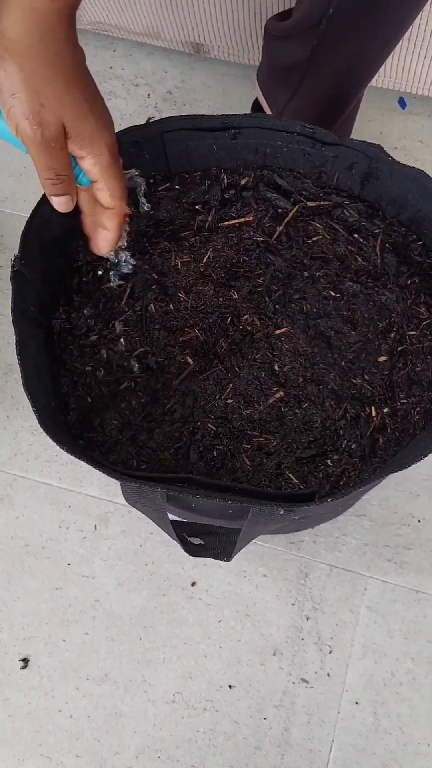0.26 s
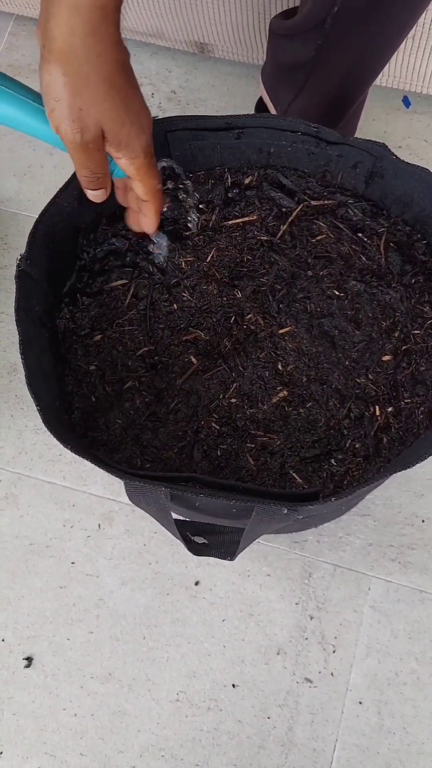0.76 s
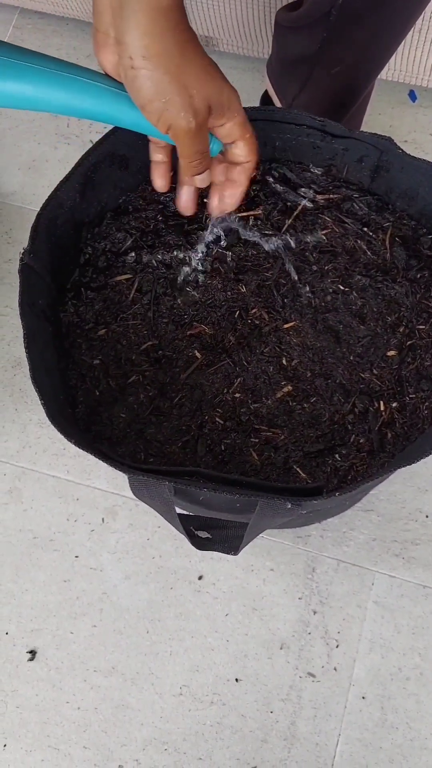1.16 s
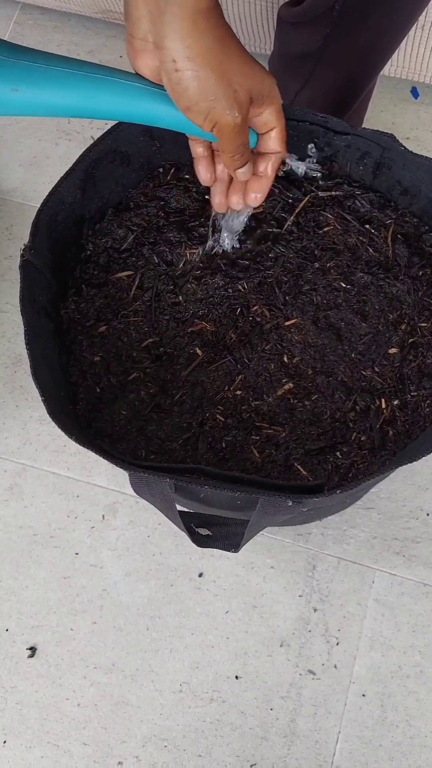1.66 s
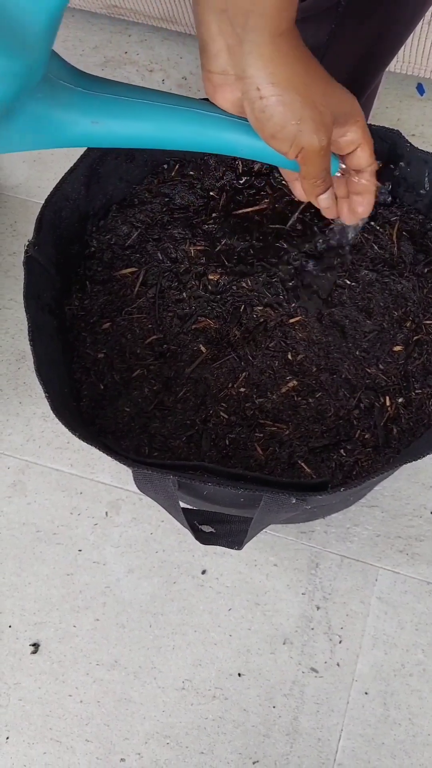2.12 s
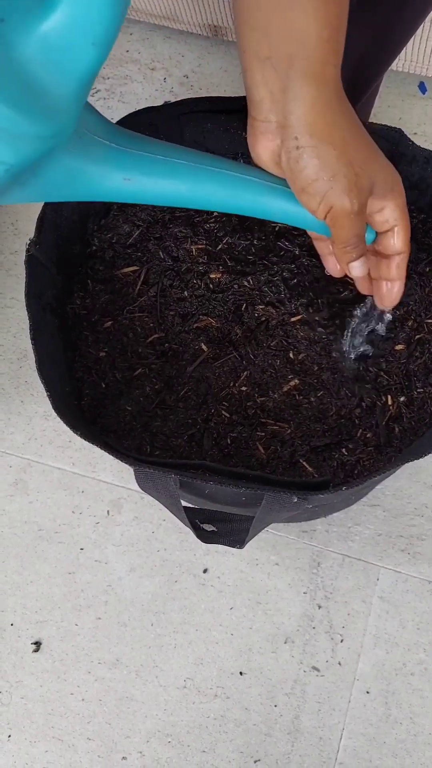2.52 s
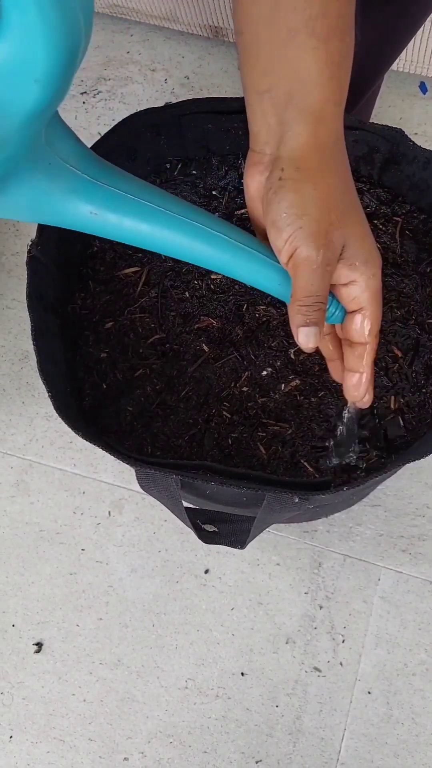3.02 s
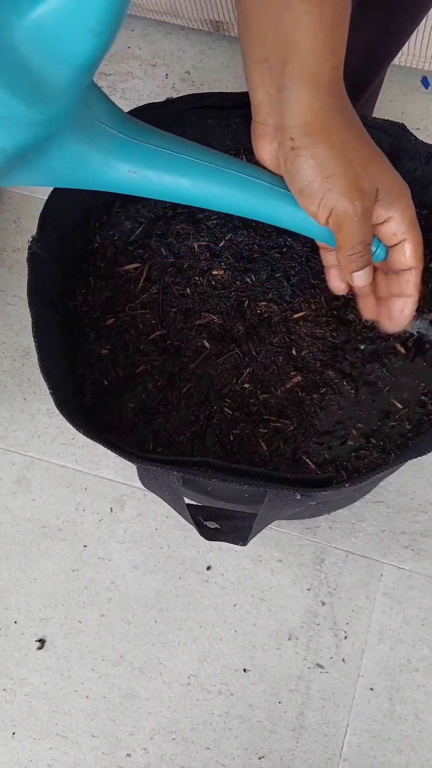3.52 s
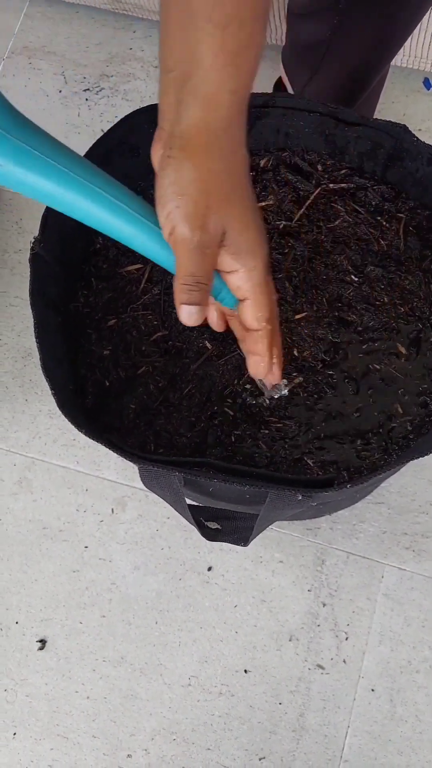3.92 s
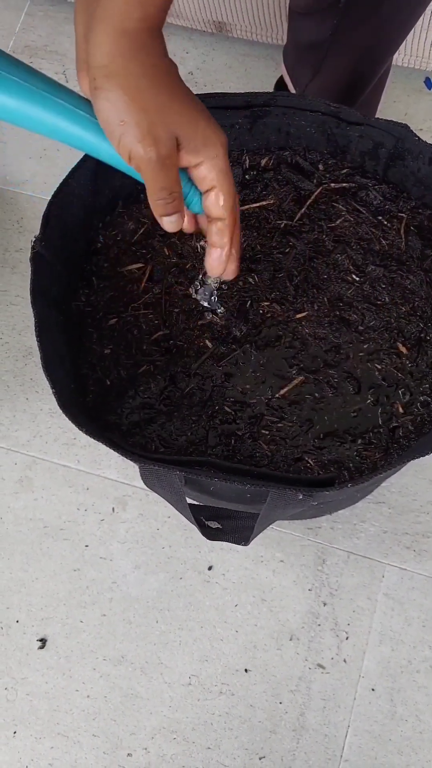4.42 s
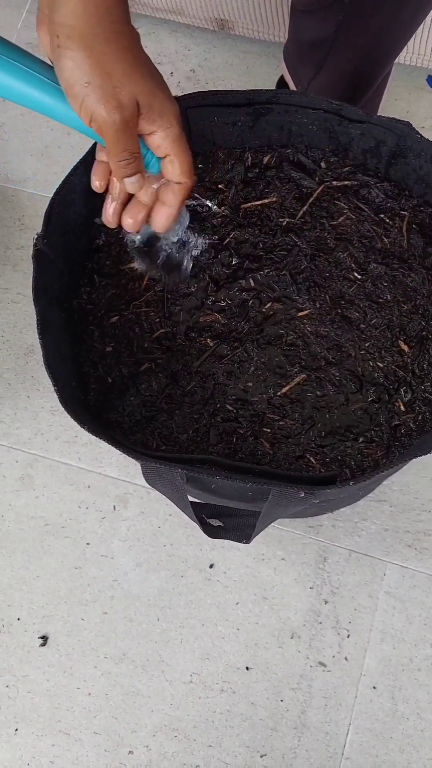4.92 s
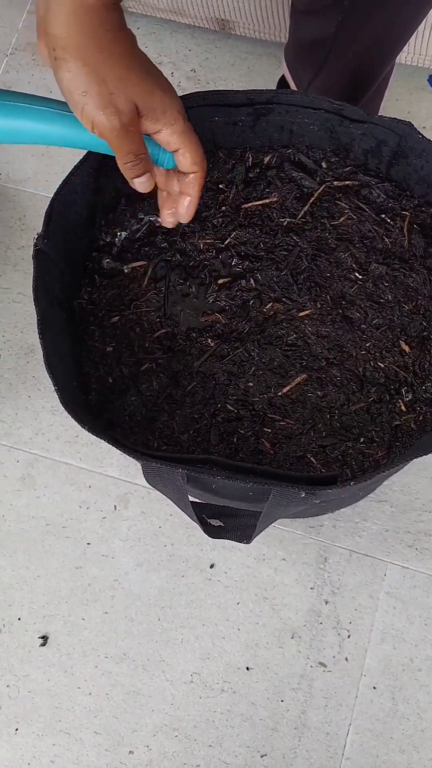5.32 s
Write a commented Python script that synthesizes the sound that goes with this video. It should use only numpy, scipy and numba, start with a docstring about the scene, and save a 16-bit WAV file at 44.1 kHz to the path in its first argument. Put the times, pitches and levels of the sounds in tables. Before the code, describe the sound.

Water from a watering can runs over a hand and patters onto damp soil in a fabric pot outdoors. Short irregular gushes crackle brightly, with sharp drop ticks and tiny plips; fullest around one to two seconds, thinner near three, then livelier again and fading to a trickle. Close phone stereo, water stronger and brighter on the left, with low machine hum and rumble behind.

```python
"""Watering can over a hand

Close to a phone, water runs from a watering can over a hand and patters onto damp soil in a grow bag.
Droplets crackle, single drops tick and bubbles plip: all are short damped rings, in their thousands.
Standing water rings and glides under the stream: noisy splashes through a moving resonance, and gargling rings.
The left microphone is nearer the water; behind lie a low machine hum of sines and outdoor rumble of noise."""
import sys
import numpy as np
from scipy import signal
from scipy.fft import rfft, irfft, next_fast_len
from scipy.io import wavfile
from scipy.ndimage import uniform_filter1d
from numba import njit

SR = 44100
rng = np.random.default_rng(int(sys.argv[2]) if len(sys.argv) > 2 else 0)


def file_out(sig):
    """Save sig as 16-bit WAV at sys.argv[1]."""
    # one column per channel
    cols = np.atleast_2d(sig).T
    # limit, then scale
    lim = np.clip(cols, -1, 1)
    pcm = np.round(lim * 32767).astype(np.int16)
    wavfile.write(sys.argv[1], SR, pcm)


N = 245460
TIME = np.arange(N) / SR


def flow(trickle_db=0, axis=2):
    """Strength of the stream: the water leaves the fingers in gushes, on top of a thin trickle."""
    # gushes: start_s, length_s, droplet_patter_db, bubbling_db
    gushes = [(0.0, .02, -52, -72), (0.07, .06, -55, -62), (0.245, 0.054, -58.5, -62),
              (0.36, .04, -48.5, -64), (0.47, .08, -54, -62), (0.575, .06, -46.5, -64),
              (0.705, .02, -59, -68), (0.76, 0.093, -52.5, -68), (0.92, .02, -55.5, -63),
              (1.008, 0.15, -53.5, -62.5), (1.15, .02, -47, -72), (1.19, 0.054, -48, -56.5),
              (1.245, .085, -45.5, -53.5), (1.435, 0.078, -56, -61.5), (1.565, .045, -49, -60),
              (1.725, .065, -48.5, -56), (1.85, .035, -49, -56), (1.955, .175, -52, -56.5),
              (2.16, 0.12, -50, -56.5), (2.34, .21, -56, -74), (2.58, .025, -57.5, -61),
              (2.67, .115, -55.5, -58), (2.89, 0.05, -58.5, -85.5), (2.975, 0.037, -53, -70),
              (3.15, .11, -59, -87), (3.295, 0.021, -51, -64), (3.37, .08, -59.5, -76),
              (3.505, .17, -51, -76), (3.733, .05, -51, -65), (3.82, .08, -49, -84), (4.018, .04, -48, -78),
              (4.11, 0.028, -58, -60.5), (4.255, .11, -51.5, -80), (4.4, .04, -59.5, -80),
              (4.475, 0.097, -52.5, -67), (4.57, .065, -47.5, -61), (4.69, 0.066, -58.5, -83),
              (4.77, .215, -50, -67), (5.01, .05, -57.5, -76), (5.115, 0.06, -53.5, -63),
              (5.5, .07, -56.5, -87)]
    # the trickle that runs on between them: time_s, level_db
    trickle = [(0, -64.5), (1.4, -65), (2.5, -62), (2.85, -69.5), (3.1, -71), (3.6, -64.5), (4.2, -68.5),
               (4.7, -62.5), (5.2, -65.5), (5.38, -78), (5.5, -67.5)]
    gushing = envelope(gushes, attack_s=.016, release_s=.016, axis=axis)
    return np.hypot(gushing, undb(curve(trickle) + trickle_db))


def patter(stream):
    """The broken stream lands as clumps of droplets, each a tiny ring."""
    # colour of the patter on soil: pitch_hz, level_db
    soil_colour = [(700, -44), (1800, -19), (3400, -9), (4500, -15), (6500, -10.5), (8000, -6),
                   (10000, -4.5), (12300, 1.5), (15500, -3.5)]
    drops = droplets(count=22000, low_hz=4000, high_hz=16000, scatter_db=5.5, cycles=1.2)
    drops = drops * clumps(fade_s=.0015, count=1800)
    return steady(colour(drops, soil_colour), .032) * stream * undb(-2.5)


def spray(stream):
    """The finest droplets sizzle evenly above the patter: tiny rings through a high-pass."""
    drops = droplets(count=16000, low_hz=13000, high_hz=17000, scatter_db=7, cycles=1.2)
    treble = signal.butter(3, 12500, "highpass", fs=SR, output="sos")
    return steady(signal.sosfilt(treble, drops), .084) * stream * undb(-6)


def ticks(stream):
    """Each drop snaps on the soil with a duller body, rebounds, and throws splashlets that land just after."""
    # single drops, loud and faint: time_s, level_db (before the gain), pitch_hz, body_db (relative to the snap)
    placed_drops = [(0.0051, -42.5, 12500, -26), (0.0427, -44, 11700, -22), (0.0773, -28, 11050, -30),
                    (0.0802, -26, 14400, -18), (0.1139, -28, 14200, -28), (0.2441, -35.5, 12500, -24),
                    (0.2618, -36, 12900, -26), (0.2676, -30, 14500, -32), (0.2933, -44, 9600, -22),
                    (0.3155, -39, 13200, -29), (0.3472, -25.5, 14500, -22), (0.3669, -15, 11650, -32),
                    (0.4742, -38, 12600, -10), (0.5, -40, 12900, -20), (0.5076, -34.5, 11200, -9),
                    (0.5742, -47, 12900, -22), (0.5892, -38, 14000, -29), (0.6061, -37, 11800, -20),
                    (0.6144, -33, 13000, -20), (0.6514, -38, 12600, -9), (0.708, -37.5, 9500, -10.5),
                    (0.7526, -46, 9300, -22), (0.771, -32, 13000, -35), (0.7943, -38, 13000, -24),
                    (0.8426, -34, 13600, -21), (0.8991, -42, 14600, -26), (0.925, -29.5, 13700, -34),
                    (0.9385, -34, 12300, -23), (0.9851, -36, 13200, -33), (1.0143, -35, 12500, -21),
                    (1.0819, -32, 12100, -26), (1.0941, -35, 13500, -13), (1.1157, -38, 12500, -13),
                    (1.138, -31, 13000, -20), (1.1611, -38, 9600, -18), (1.1914, -35, 13000, -20),
                    (1.2491, -38, 12500, -8), (1.2547, -32, 13100, -22), (1.2581, -44, 11900, -18),
                    (1.271, -37, 8900, -13), (1.3114, -34, 11300, -20), (1.3572, -38, 11100, -17),
                    (1.431, -33.5, 12900, -22), (1.4467, -33, 11400, -25), (1.4999, -35.5, 12700, -20),
                    (1.5469, -33, 12400, -10), (1.5646, -28, 8900, -33), (1.5693, -27, 13600, -40),
                    (1.6228, -40, 11200, -20), (1.6471, -37.5, 11900, -13), (1.7463, -30, 14000, -34),
                    (1.765, -41, 12500, -10), (1.8544, -40, 13000, -22), (1.8647, -29, 12800, -25),
                    (1.8726, -34, 13200, -24), (1.9325, -35, 12000, -30), (1.9552, -28, 13900, -23),
                    (1.9602, -32.5, 12400, -10), (1.9926, -31, 13300, -11), (1.9991, -48, 12500, -10),
                    (2.057, -30.5, 13300, -30), (2.0845, -31, 11600, -19), (2.1331, -33.5, 12400, -7),
                    (2.1594, -33.5, 9400, -5), (2.1852, -27, 14000, -10.5), (2.2015, -35.5, 9600, 1),
                    (2.2598, -35, 13500, -18), (2.272, -29.5, 12000, -19), (2.4222, -39, 12400, -23),
                    (2.47, -38, 11900, -15), (2.5032, -35.5, 12600, -26), (2.5234, -42, 13000, -19.5),
                    (2.5506, -44, 14500, -28), (2.5636, -42, 11900, -22), (2.6243, -32.5, 11000, -31),
                    (2.6907, -33, 12200, -13), (2.7171, -36, 13200, -17), (2.7868, -32.5, 13600, -26),
                    (2.898, -34.5, 12700, -36), (2.9296, -47, 11700, -35), (2.9415, -38, 13500, -40),
                    (3.0141, -44, 10400, -13), (3.1094, -41.5, 12300, -28), (3.1293, -38, 12200, -24),
                    (3.1528, -45, 15100, -26), (3.1909, -40, 12800, -36), (3.197, -33, 14400, -33),
                    (3.2991, -34, 10800, -25), (3.3726, -31.5, 11800, -22), (3.4338, -36, 12100, -14.5),
                    (3.5096, -38, 14700, -22), (3.5908, -42.5, 8700, -20), (3.6102, -39, 12200, -20),
                    (3.6451, -40, 15200, -24), (3.6531, -42.5, 12100, -1), (3.7097, -33.5, 11200, -31),
                    (3.7441, -39, 13500, -31), (3.7879, -43, 13000, -14), (3.8238, -27.5, 14900, -15),
                    (3.8574, -32, 14900, -9.5), (3.8872, -31.5, 12400, -31), (3.9126, -46, 13100, -21),
                    (3.9509, -36.5, 12600, -33), (3.977, -35, 13100, -36), (4.0028, -37, 14800, -26),
                    (4.023, -32, 11600, -11.5), (4.2714, -46, 13100, -27), (4.3625, -35.5, 12800, -10),
                    (4.4068, -32, 14700, -11.5), (4.4895, -33, 14900, -22), (4.512, -38, 15100, -28),
                    (4.5415, -34.5, 11800, -24), (4.5738, -37, 14800, -17), (4.585, -44, 12000, -5),
                    (4.614, -34, 12100, -24), (4.6232, -38, 13500, -29), (4.6268, -33, 13000, -21),
                    (4.6412, -34, 12900, -21), (4.6611, -38, 13100, -9.5), (4.6663, -35, 13500, -10),
                    (4.6918, -36, 13200, -23), (4.7411, -39, 11000, -23), (4.7832, -41, 12130, -16),
                    (4.806, -39, 13000, -24), (4.8366, -41, 13100, -13), (4.8703, -35, 14600, -13),
                    (4.8874, -38, 14500, -20), (4.8991, -46, 12600, -14), (4.9377, -22.5, 14800, -36),
                    (4.9596, -26, 14020, -23), (4.9638, -20, 13100, -31), (4.9839, -31, 12400, -25),
                    (5.0164, -42, 10900, -13), (5.0465, -40, 15100, -24), (5.0547, -41, 14500, -16),
                    (5.1263, -25, 12400, -41), (5.2614, -37, 9300, -31), (5.362, -45.5, 10620, -13)]
    gain_db, cycles = 4, 1.15
    body_hz, body_cycles = 4800, .6
    rebound_s, rebound_db = .0006, -6
    splash_s, splash_db = .0095, -13

    s, db, hz, body_db = np.transpose(np.vstack([placed_drops, stray_drops(stream)]))
    size = undb(db + gain_db)
    body = np.full(len(s), body_hz)
    out = grains(s, size, hz, cycles / hz)
    out += grains(s, size * undb(body_db), body, body_cycles / body)
    rebound_at = s + rebound_s * (.5 + rng.random(len(s)))
    out += grains(rebound_at, size * undb(rebound_db), hz, cycles / hz)
    for _ in range(3):  # splashlets per drop, weaker the later they land
        late, pitch = rng.random((len(s), 2)).T
        wait = .5 - np.log(1 - late)
        splash_hz = hz * (.75 + .4 * pitch)
        splash_size = size * undb(splash_db) / (1 + wait)
        out += grains(s + splash_s * wait, splash_size, splash_hz, cycles / splash_hz)
    return out


def stray_drops(stream, count=110):
    """More drops fall at random, harder and more often when more water flows: rows like the placed drops."""
    typical_db, above_stream_db = -54, 12
    pitch_hz, pitch_spread = 13200, .1
    body_db, body_scatter_db = -21, 5
    poured = np.cumsum(np.sqrt(stream)) / np.sum(np.sqrt(stream))
    s = np.interp((np.arange(count) + rng.random(count)) / count, poured, TIME)
    pitch, body = np.clip(rng.standard_normal((count, 2)), -2, 2).T
    stream_db = 20 * np.log10(np.interp(s, TIME, stream))
    db = (stream_db + typical_db) / 2 + above_stream_db  # follows the stream by half
    hz = pitch_hz * np.exp(pitch_spread * pitch)
    return np.column_stack([s, db, hz, body_db + body_scatter_db * body])


def plips():
    """Plips: short rings of a few cycles, rising slightly in pitch, from bubbles and the duller part of drop ticks."""
    # single plips: time_s, level_db (before the gain), pitch_hz (two swell times in)
    plip_rows = [(0.081, -43, 7150), (0.087, -47, 4280), (0.2497, -58, 3030), (0.3482, -50.5, 3540),
                 (0.3653, -33, 7000), (0.474, -43.5, 6400), (0.4867, -37.5, 5450), (0.523, -44, 6250),
                 (0.536, -46, 7320), (0.6105, -36.5, 5200), (0.623, -41, 5440), (0.763, -49, 5640),
                 (0.779, -49.5, 5900), (0.7847, -51, 5470), (0.842, -61, 3500), (0.925, -45, 7400),
                 (1.094, -57, 3430), (1.151, -56, 6100), (1.1613, -51, 7700), (1.1843, -45, 7350),
                 (1.211, -44, 3250), (1.2685, -50, 4000), (1.272, -48.5, 2430), (1.3257, -46, 4530),
                 (1.4444, -46, 5960), (1.464, -45, 5450), (1.481, -51, 3800), (1.5203, -51, 5070),
                 (1.5833, -48, 5440), (1.6156, -53.5, 5960), (1.7423, -41.5, 6400), (1.7872, -54, 3560),
                 (1.8031, -47, 5380), (1.8652, -63, 4950), (1.9333, -46, 7460), (1.9616, -49, 4940),
                 (2.0664, -44, 6650), (2.0788, -47, 6240), (2.1175, -30.5, 6600), (2.1288, -44, 6740),
                 (2.159, -40, 3530), (2.288, -44, 4300), (2.373, -61, 3150), (2.423, -47.5, 6600),
                 (2.468, -49, 6840), (2.5865, -47.5, 4040), (2.666, -52, 5460), (2.7024, -60, 2950),
                 (2.733, -49, 5000), (2.7869, -50, 6900), (2.8011, -57, 3180), (3.516, -44.5, 7000),
                 (3.5217, -50, 6560), (3.6075, -49, 6860), (3.6533, -46, 6860), (3.7596, -47.5, 5550),
                 (3.843, -37.5, 7540), (4.022, -48.5, 2130), (4.2903, -63, 6000), (4.4374, -47, 5860),
                 (4.5166, -53, 5100), (4.546, -52, 5570), (4.6603, -46.5, 6100), (4.668, -51, 5400),
                 (4.7627, -51, 5940), (4.808, -51, 3530), (4.853, -43.5, 3970), (4.853, -45, 5640),
                 (4.967, -47, 3630), (5.108, -49, 5900), (5.1347, -58, 4430), (5.165, -47, 6370),
                 (5.181, -55, 4000)]
    gain_db, cycles, glide = 5, 2.0, .0042
    s, db, hz = np.transpose(plip_rows)
    return grains(s, undb(db + gain_db), hz / (1 + 2 * glide), cycles / hz, glide, count=512)


def bubbling(count=2200):
    """Air trapped in the wet soil rings as small, quickly damped bubbles."""
    small_hz, big_hz, big_share, spread = 5700, 3500, .19, .18
    cycles, glide = .68, .0028
    when, kind = rng.random((count, 2)).T
    size, pitch = rng.standard_normal((count, 2)).T
    big = big_hz * np.exp(spread * np.abs(pitch))
    small = small_hz * np.exp(spread * pitch)
    hz = np.where(kind < big_share, big, small)
    sizes = undb(5.5 * np.minimum(size, 1.5))
    bubbles = grains(when * N / SR, sizes, hz, cycles / hz, glide, count=256)
    return steady(bubbles, .0216) * flow(trickle_db=-5, axis=3) * undb(-4)


def spatter():
    """A fuller, lower splash on pooled water; the hollow rings at its lower edge and glides as it changes size."""
    # slaps into standing water: start_s, length_s, level_db, first_edge_hz, last_edge_hz
    slaps = [(0.25, 0.17, -67, 2600, 2100), (1.08, 0.22, -64.5, 2320, 2200), (1.245, 0.08, -61, 2200, 2130),
             (1.86, 0.49, -65.5, 2720, 3180), (2.31, 0.12, -68.5, 2400, 2100),
             (3.515, 0.032, -68, 3000, 3000), (3.817, 0.084, -64, 2420, 1300),
             (4.022, 0.035, -62, 1410, 2090), (4.47, 0.15, -70, 2300, 2200), (4.772, 0.12, -70, 3700, 3300),
             (4.85, 0.055, -64.5, 3130, 2900), (4.96, 0.037, -63, 3300, 3000)]
    drops = droplets(count=14000, low_hz=1200, high_hz=7000, scatter_db=4.5, cycles=.45)
    drops = drops * clumps(fade_s=.002, count=4500)
    edges = []
    for s, length, _, first, last in slaps:
        edges += [(s, first), (s + length, last)]
    ringing = resonant_highpass(drops, curve(edges), .69)
    return steady(ringing, .02) * envelope(slaps, attack_s=.016, release_s=.029)


@njit
def resonant_highpass(x, hz, damping):
    """State-variable high-pass that rings at its moving edge."""
    y, band, low = np.empty(len(x)), 0., 0.
    for i in range(len(x)):
        g = np.tan(np.pi * hz[i] / SR)
        v = (band + g * (x[i] - low)) / (1 + g * (g + damping))
        y[i] = x[i] - damping * v - (low + g * v)
        band, low = 2 * v - band, low + 2 * g * v
    return y


def gargle(count=1500):
    """Splashes ring the small hollow between spout and palm, whose pitch glides as it fills and empties."""
    # gargles: start_s, length_s, level_db, first_pitch_hz, last_pitch_hz, swell_cycles
    hollows = [(2.325, 0.044, -67, 2070, 2110, 6), (2.705, 0.039, -69, 2850, 3020, 3),
               (3.844, 0.018, -62.5, 2140, 2250, 8), (3.879, 0.02, -65, 2090, 2200, 8),
               (3.925, 0.056, -71, 2190, 2070, 5), (4.027, 0.0069, -70, 2150, 2050, 4),
               (4.772, 0.064, -66, 3760, 3400, 5.4), (4.857, 0.066, -72.5, 3150, 2800, 5)]
    pitch_spread, scatter_db = .01, 3
    when = (np.arange(count) + rng.random(count)) / count * N / SR
    size, pitch = rng.standard_normal((count, 2)).T
    glides = []
    for s, length, _, first, last, ring in hollows:
        glides += [(s, first, ring), (s + length, last, ring)]
    hz = np.interp(when, TIME, curve(glides)) * np.exp(pitch_spread * pitch)
    cycles = np.interp(when, TIME, curve(glides, axis=2))
    rings = grains(when, undb(scatter_db * size), hz, cycles / hz, count=1800)
    return steady(rings, .017) * envelope(hollows, attack_s=.015, release_s=.018)


def microphones(x):
    """The left port hears the water first; the right hears it later, shaded and mostly by reflection."""
    # delay at the right as the hand sweeps across the bag and back: time_s, lag_ms
    lag = [(0, .2), (2.2, 0.17), (2.7, 0.41), (4.2, 0.41), (4.6, 0.19)]
    # the phone shades the right microphone from the water: pitch_hz, level_db
    shade = [(1500, -2.5), (3400, 1.5), (4300, -8.5), (5700, 2), (7500, -3.5), (10000, -11.5), (12500, -7),
             (15500, -11)]
    near_t60, wall_t60 = .015, .11  # s
    left = x + undb(-11) * scatter(x, near_t60) + undb(-22) * scatter(x, wall_t60)
    right = undb(-8) * np.interp(TIME - curve(lag) / 1000, TIME, x)
    right = right + scatter(x, near_t60) + undb(-12) * scatter(x, wall_t60)
    return np.array([left, undb(-2) * colour(right, shade)])


def scatter(x, t60, count=4):
    """Dense early reflections from the bag, the hand and the paving: noise tails whose mix wanders."""
    t = np.arange(int(t60 * SR)) / SR
    out = 0
    for _ in range(count):
        tail = rng.standard_normal(len(t)) * undb(-60 * t / t60)
        tail = tail * (1 - np.exp(-t / .0004))  # soft onset
        echo = signal.fftconvolve(x, tail / np.linalg.norm(tail))[:N]
        out = out + walk(14) * echo
    return out / np.sqrt(count)


def hum():
    """Wavering sine lines of a machine some way off, and a short low drone."""
    # lines of the hum: pitch_hz, level_db (relative to the hum), waver_db, phase_wander_rad
    lines = [(120, -0.5, 2, 0.43), (70.4, -10, 3.5, 0.72), (130.7, -14.5, 1, 1), (175.3, -18, 2.5, 0.74),
             (213.3, -17, 1, 1), (231.3, -17, 3.5, 1), (280, -16.5, 7.5, 1), (646, -35, -10, 0.14)]
    # the hum swells or sinks now and then: middle_s, half_width_s, change_db
    hum_swells = [(0.28, 0.036, 7), (1.58, 0.14, -29), (2.54, 0.035, 11.5), (3.01, 0.052, 10.5),
                  (3.2, 0.087, -7), (3.77, 0.066, -22)]
    # the drone: start_s, length_s, level_db
    drones = [(1.895, 0.2, -48.5)]
    level_db = -53 + swells(hum_swells) + 1.5 * walk(5.4)
    drone = unit(np.sin(2 * np.pi * 90 * TIME + .32 * walk(18.4)))  # 90 Hz
    out = envelope(drones, attack_s=.037, release_s=.02) * drone
    for hz, db, waver_db, wander in lines:
        line = np.sin(2 * np.pi * hz * TIME + wander * walk(12))
        out += undb(level_db + db) * unit(line * undb(waver_db * walk(12)))
    return out


def outdoors():
    """Distant rumble of coloured noise, nearly alike on both sides around 70 Hz and more diffuse above."""
    # spectrum of the rumble: pitch_hz, level_db (per Hz, relative)
    rumble = [(22, -35), (36, -8.5), (48, -10), (68, 1), (92, -1.5), (106, -4.5), (130, -1), (165, -12.5),
              (220, -9.5), (330, -14.5), (550, -26), (1000, -25.5), (1400, -27), (1900, -36.5),
              (2800, -43.5), (6000, -48.5), (16000, -51)]
    # how wide it is: pitch_hz, side_minus_mid_db
    width = [(30, -1), (70, -20.5), (130, -9.5), (250, -7.5), (500, -5.5), (1200, 2), (3000, 1)]
    # its balance: pitch_hz, left_minus_right_db
    lean = [(100, 0.5), (200, -4), (600, 2.5), (1000, -0.5), (1500, -3.5), (2500, -2.5), (5000, 1),
            (12000, 11.5)]
    # it swells now and then: middle_s, half_width_s, change_db
    rumble_swells = [(4.65, 0.098, 3.5)]
    level_db, fade_db_per_s, flutter_db = -50, .55, 1.0
    mid = colour(rng.standard_normal(N), rumble)
    side = colour(colour(rng.standard_normal(N), rumble), width)
    pair = np.array([colour(mid + side, lean), mid - side])
    level = level_db - fade_db_per_s * TIME + swells(rumble_swells) + flutter_db * walk(5.9)
    return unit(pair) * undb(level)


def boom():
    """A narrow band of noise in the rumble that swells and sinks on its own."""
    # changes of the boom: middle_s, half_width_s, change_db
    boom_swells = [(0.7, 0.29, -19), (1.26, 0.078, 9.5), (1.73, 0.052, 9.5), (2.7, 0.73, 6.5),
                   (3.2, 0.045, 7.5), (4.95, 0.2, 4.5)]
    band = signal.butter(2, [190, 245], "bandpass", fs=SR, output="sos")
    noise = unit(signal.sosfilt(band, rng.standard_normal(N)))
    return noise * undb(-66.5 + swells(boom_swells) + walk(5.4))  # wanders by 1 dB


def droplets(count, low_hz, high_hz, scatter_db, cycles):
    """A stream of tiny rings at random moments, unequal in size, pitch and damping."""
    when, pitch, damping = rng.random((count, 3)).T
    hz = low_hz + (high_hz - low_hz) * pitch
    sizes = undb(scatter_db * np.minimum(rng.standard_normal(count), 2.5))
    return grains(when * N / SR, sizes, hz, cycles * (.5 + damping) / hz, count=96)


def grains(times, sizes, hz, swell_s, glide=0, count=128):
    """Rings of count samples that swell for swell_s and die away; glide is the relative rise per swell time."""
    t = np.arange(count) / SR
    age = t / swell_s[:, None]
    bend = 1 + glide * np.minimum(age, 10) / 2
    phase = 2 * np.pi * (hz[:, None] * t * bend + rng.random((len(hz), 1)))
    waves = sizes[:, None] * age * np.exp(1 - age) * np.sin(phase)
    where = np.maximum(times * SR, 0).astype(int)[:, None] + np.arange(count)
    return np.bincount(where.ravel(), waves.ravel(), N)[:N]


def clumps(fade_s, count):
    """Each blob of water lands at once and breaks up over a few milliseconds: an amplitude envelope."""
    when, size = rng.random((count, 2)).T
    blobs = np.minimum(-np.log(1 - size), 3.5) ** 2
    landings = np.bincount((when * N).astype(int), blobs, N)
    power = signal.lfilter([1], [1, -np.exp(-1 / (fade_s * SR))], landings)
    return np.sqrt(power + np.mean(power) / 20)


def steady(x, seconds):
    """Even out the slow level of a stream of grains, so that the gain applied after it sets the level."""
    power = uniform_filter1d(x ** 2, int(seconds * SR))
    return x / np.sqrt(np.abs(power) + np.mean(x ** 2) / 20)


def envelope(rows, attack_s, release_s, axis=2):
    """Gain of events (start, length, .. dB ..) that rise around their start, hold, and die away; powers add."""
    power = np.zeros(N)
    for row in rows:
        age = TIME - row[0]
        rise = np.clip(.5 + age / attack_s, 0, 1)
        fall = np.exp(-np.clip((age - row[1]) / release_s, 0, 20))
        power += (undb(row[axis]) * rise * fall) ** 2
    return np.sqrt(power)


def swells(rows):
    """Bell-shaped changes of level, in dB."""
    return sum(db * np.exp(-((TIME - s) / width) ** 2) for s, width, db in rows)


def walk(rate):
    """Smooth random wander with spread 1, through rate random knots a second."""
    knots = rng.standard_normal(4096)
    return unit(np.interp(TIME * rate, np.arange(len(knots)), knots))


def curve(rows, axis=1):
    """One column of a timed table, at every sample."""
    rows = np.array(rows)
    return np.interp(TIME, rows[:, 0], rows[:, axis])


def colour(x, points):
    """Filter by a spectrum of (Hz, dB) points, joined along log frequency."""
    hz, db = np.transpose(points)
    size = next_fast_len(N + 4096)
    bins = np.maximum(np.fft.rfftfreq(size, 1 / SR), 1)
    gain = undb(np.interp(np.log(bins), np.log(hz), db))
    return irfft(rfft(x, size) * gain, size)[:N]


def undb(db):
    """Decibels to gain."""
    return 10 ** (np.asarray(db) / 20)


def unit(x):
    """Scale to rms 1."""
    return x / np.sqrt(np.mean(x ** 2))


def scene():
    """The water in front of the steadier background."""
    stream = flow()
    water = patter(stream) + spray(stream) + ticks(stream) + plips()
    water = water + bubbling() + spatter() + gargle()
    return microphones(water) + hum() + outdoors() + boom()


def record(dry):
    """The phone cuts the top, above 16.2 kHz."""
    return signal.sosfilt(signal.ellip(10, .1, 70, 16200, fs=SR, output="sos"), dry)


dry = scene()
out = record(dry)
file_out(out)
```